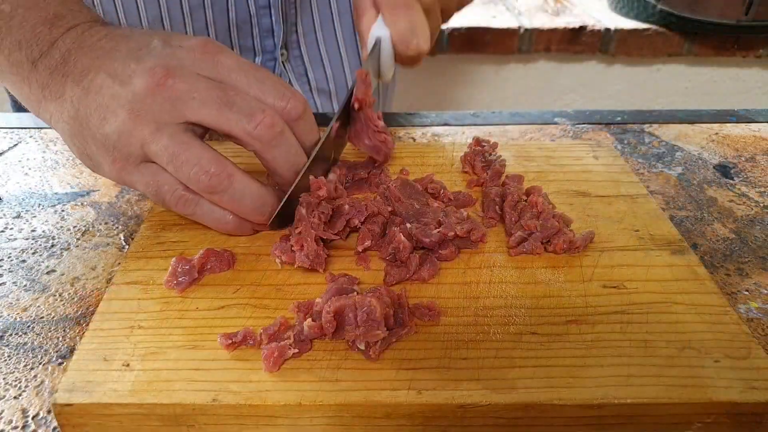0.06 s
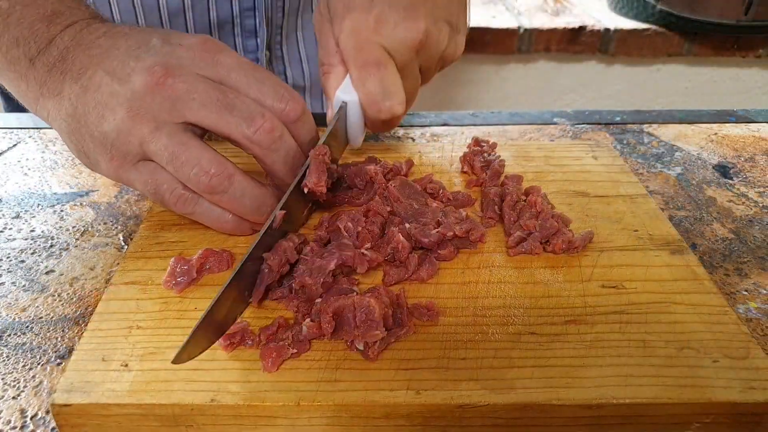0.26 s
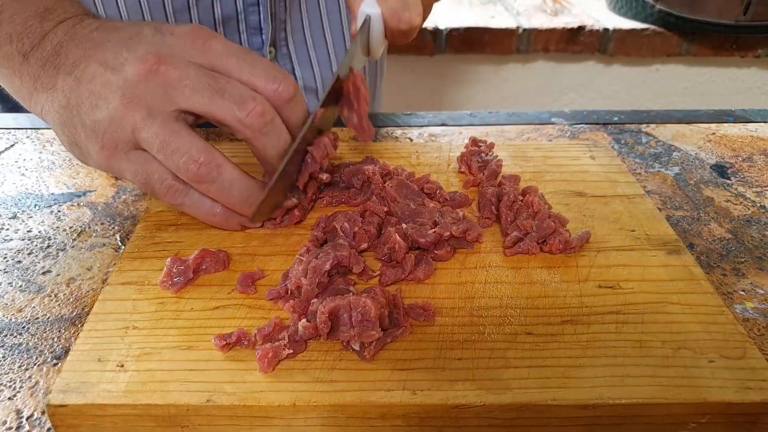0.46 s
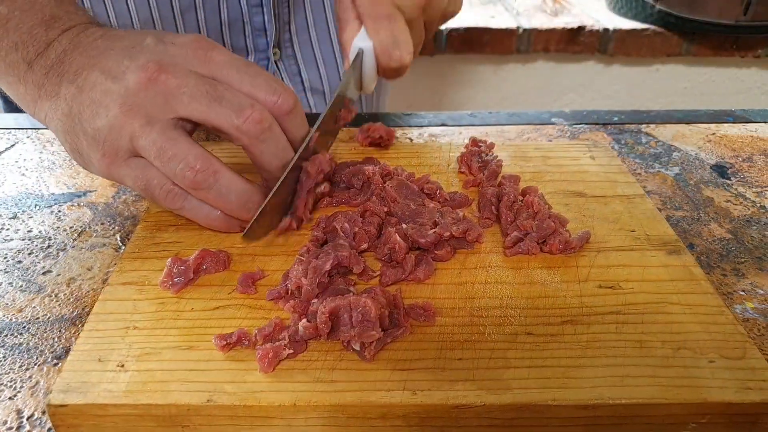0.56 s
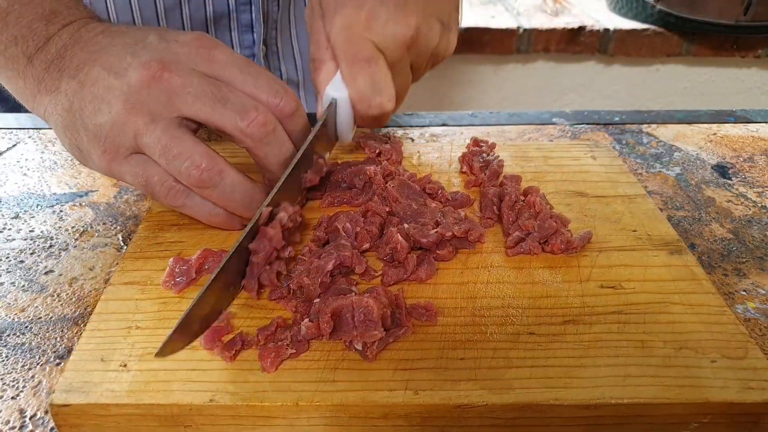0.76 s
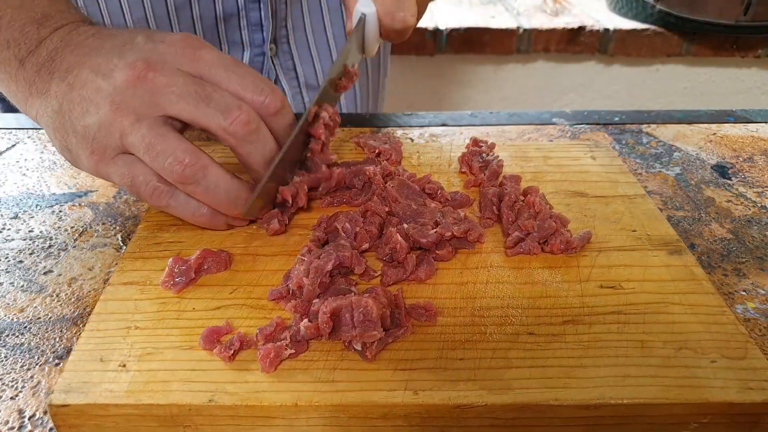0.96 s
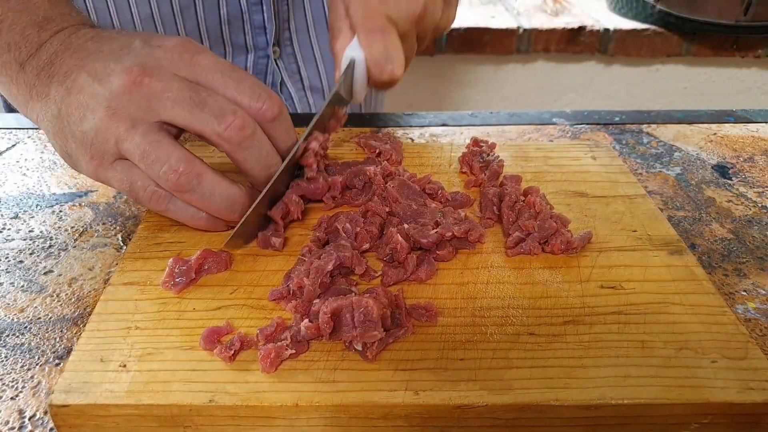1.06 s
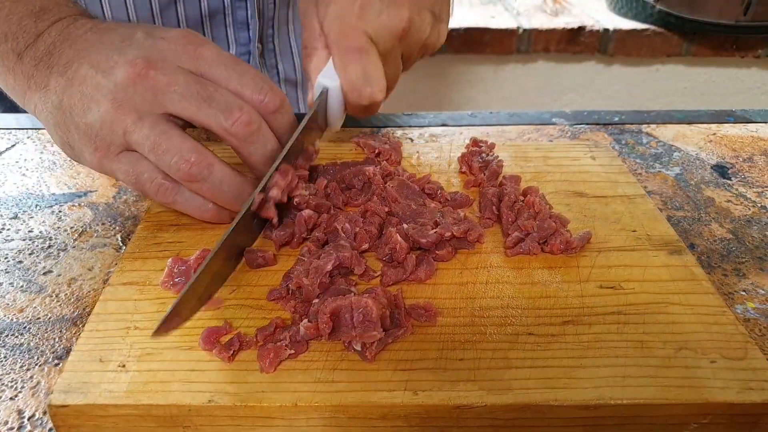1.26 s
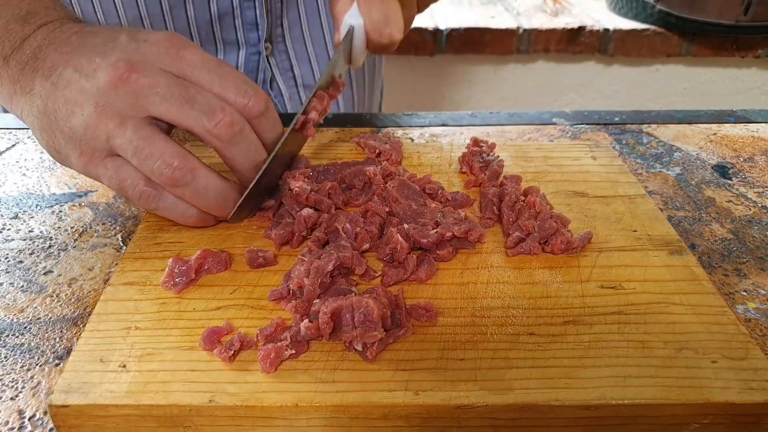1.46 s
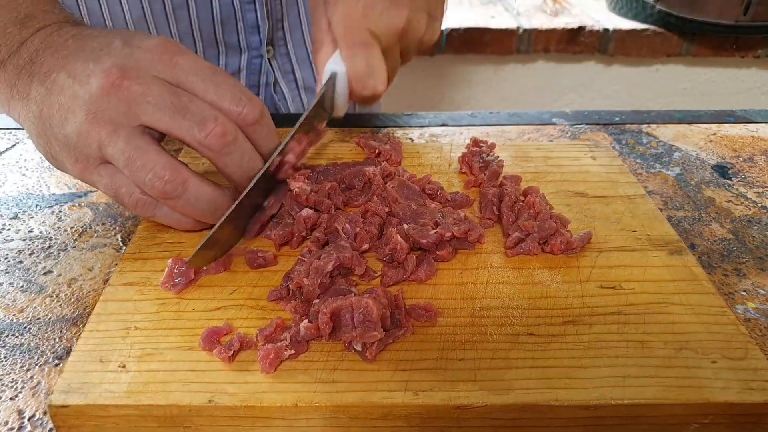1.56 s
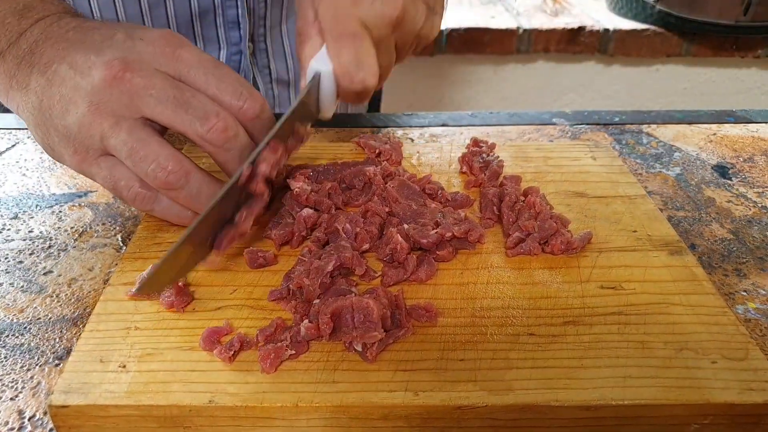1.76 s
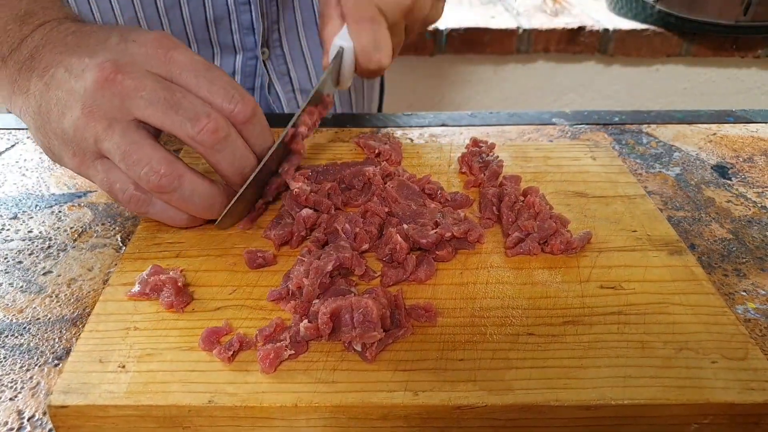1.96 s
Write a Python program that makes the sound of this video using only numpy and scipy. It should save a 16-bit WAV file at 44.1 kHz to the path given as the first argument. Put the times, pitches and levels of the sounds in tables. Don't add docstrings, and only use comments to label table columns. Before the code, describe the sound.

Knife blade knocking a wooden cutting board about twice a second, rubbing through wet raw meat

```python
import sys
import numpy as np
from scipy import signal
from scipy.fft import rfft, irfft, next_fast_len
from scipy.io import wavfile
from scipy.ndimage import uniform_filter1d, map_coordinates

SR = 44100
rng = np.random.default_rng(int(sys.argv[2]) if len(sys.argv) > 2 else 0)


def output_pcm(signal):
    pcm = np.clip(np.atleast_2d(signal).T, -1, 1) * 32767
    wavfile.write(sys.argv[1], SR, np.round(pcm).astype(np.int16))


def ratio(d):
    e = np.asarray(d, float) / 20
    return 10 ** e


N = 88200
T = np.arange(N) / SR


def unit(x):
    return x / np.sqrt(np.mean(x ** 2) + 1e-20)


def along(points, hz):
    f, v = np.transpose(points)
    return np.interp(np.log(hz + 1), np.log(f + 1), v)


def wobble(rate):
    knots = rng.standard_normal(int(N * rate / SR) + 4)
    return map_coordinates(knots, [T * rate])


def filtered(x, response):
    m = next_fast_len(N + SR // 2)
    return irfft(rfft(x, m) * response(np.fft.rfftfreq(m, 1 / SR)), m)[..., :N]


def spread(pair, gain, alike):
    turn = lambda hz: np.arccos(np.clip(along(alike, hz), -1, 1)) / 2
    mid, side = filtered(pair, lambda hz: gain(hz) * [np.cos(turn(hz)), np.sin(turn(hz))])
    return unit(np.array([mid + side, mid - side]))


def add(track, s, sound):
    part = track[..., max(round(s * SR), 0):][..., :sound.shape[-1]]
    part += sound[..., :part.shape[-1]]


def grains(per_s, spread_db):
    clicks = (rng.random((2, N)) < per_s / SR) * rng.standard_normal((2, N))
    return clicks * ratio(spread_db * rng.exponential(size=(2, N)))


def peak_one(x):
    return x / np.abs(x).max()


def ring(db, hz, t60):
    contact_s, quick_hz = .002, 900
    t = T[:SR // 8]
    onset = 1 - np.exp(-t * max(hz / quick_hz, 1) ** 2 / contact_s)
    return -ratio(db - 60 * t / t60) * np.sin(2 * np.pi * hz * t) * onset


# frequency in Hz, level in dB,
# t60 in seconds, side of the node line # struck (+1 or -1).
BOARD_MODES = [(180, -12, .017, 1), (243, -3, .004, -1), (342, -27, .1, 1), (444, -22, .05, -1),
               (666, 0, .017, 1), (749, -5.5, .015, 1), (904, -24, .036, -1), (990, -12.5, .018, 1),
               (1275, -21.5, .023, -1),
               (1520, -27, .017, 1), (1780, -29, .014, -1), (2140, -21, .014, 1), (2590, -23, .016, -1),
               (3130, -26, .017, 1), (3650, -26, .015, -1)]


def board(tilt_db):
    total = 0
    for hz, db, t60, side in BOARD_MODES:
        scatter_db = .8 * rng.normal()
        brightness_db = tilt_db * max(np.log2(hz / 800), 0)
        total = total + side * ring(db + scatter_db + brightness_db, hz, t60)
    return total


# start in seconds, peak level in dB,
# brightness in dB per octave above the body.
BLOWS = [
    (.21025, -15.8, 4),
    (.7055, -18, -4.5),
    (1.177, -22, -3),
    (1.6533, -21.3, -5),
]


def blows():
    thump_hz, thump_db, thump_t60_s = 170, -25, .07
    crack_hz, crack_db, crack_t60_s = 5500, -19, .014
    wood, t = np.zeros(N), T[:SR // 8]
    lowpass = signal.butter(2, crack_hz, fs=SR)
    for s, db, tilt_db in BLOWS:
        noise = signal.lfilter(*lowpass, rng.standard_normal(len(t)))
        crack = ratio(crack_db + tilt_db - 60 * t / crack_t60_s) * noise
        thump = ring(thump_db, thump_hz, thump_t60_s)
        add(wood, s, ratio(db) * (peak_one(board(tilt_db)) + thump + crack))
    return wood


# start in seconds, peak level in dB, frequency in Hz.
TOUCHES = [(.166, -59, 507), (.177, -47.5, 720), (.229, -38.5, 680), (.676, -49, 660), (.692, -35.5, 695),
           (.726, -40.5, 720), (.740, -42.5, 790), (1.151, -48.5, 680), (1.163, -42, 684),
           (1.168, -40, 680), (1.194, -46, 680), (1.213, -60, 720), (1.241, -53, 850), (1.266, -50, 880),
           (1.279, -45.5, 906), (1.633, -48, 666), (1.640, -41.5, 650), (1.646, -41.5, 640),
           (1.679, -39.5, 766), (1.686, -45, 826), (1.735, -39, 775), (1.771, -46.5, 870)]
# start in seconds, level in dB, frequency in Hz.
RATTLE = [(0.00079, -28.5, 1246), (0.016, -42, 1385), (0.0054, -42.5, 3300), (0.00193, -45, 3300),
          (0.002, -45, 2600), (.023, -39.5, 1540), (0.01, -46, 1300)]


def touches():
    judder_s, judder_db = .004, 0
    touch_t60_s, second_mode_ratio, rattle_t60_s = .022, 1.088, .009
    slips = lambda: rng.standard_normal(round(judder_s * SR)) / np.sqrt(judder_s * SR)
    wood = np.zeros(N)
    for s, db, hz in TOUCHES:
        pair = ring(0, hz, touch_t60_s) + ring(-9.5, second_mode_ratio * hz, touch_t60_s)
        add(wood, s, ratio(db + judder_db) * peak_one(signal.fftconvolve(pair, slips())))
    for s, db, hz in RATTLE:
        add(wood, s, signal.fftconvolve(ring(db, hz, rattle_t60_s), slips()))
    return wood


# landing in seconds, cut length in seconds, slide length in seconds,
# slide level in dB.
STROKES = [
    (0.203, 0.045, 0.13, -42),
    (0.703, 0.044, 0.11, -42.5),
    (1.177, 0.032, 0.12, -43),
    (1.651, 0.03, 0.12, -43.5),
]


def pressure():
    cut_start_db, cut_rise_db, cut_end_db = -19.5, 22, -8
    bite_db, sag_db, lift_db = 1.5, -5.5, -22
    release_s, lift_fade_db_per_s = .035, 136
    levels = [cut_start_db - cut_rise_db, cut_start_db, cut_end_db, bite_db, -.6, sag_db, lift_db]
    gain = ratio(-63 - 480 * np.clip(T - .015, 0, None))
    for s, cut, slide, db in STROKES:
        end = s + slide + release_s
        times = [s - cut - .015, s - cut, s - .001, s, s + 0.23 * slide, s + slide, end]
        shape = np.interp(T, times, levels, left=-90)
        gain = gain + ratio(db + shape - lift_fade_db_per_s * np.clip(T - end, 0, None))
    return gain


# frequency in Hz, level in dB.
SLIDE = [(150, -46), (250, -12.5), (759, -9), (1130, -11.5), (1320, -2), (1940, -14.5), (3740, -10.5),
         (7490, -13), (15800, -17)]
# frequency in Hz, coherence.
SLIDE_ALIKE = [(300, .85), (1000, .7), (3500, .5), (8000, .4), (15000, .35)]
# frequency in Hz, width in Hz, level in dB.
BLADE = [(720, 240, 6), (1420, 160, -4.5), (2210, 143, 7), (2866, 375, 6.5), (3216, 94, 5.5),
         (3660, 360, 8.5), (4220, 48, 8), (5130, 84, -1), (7420, 1130, -6)]
# frequency in Hz, width in Hz, level in dB.
HEEL = [(680, 120, 4), (3738, 115, 5), (3240, 280, -2.5)]
# frequency in Hz, width in Hz, level in dB.
TIP = [(880, 72, 3.5), (3830, 170, -4.5), (3220, 250, 3.5), (5120, 650, 4.5)]


def scrape():
    chatter_db, rasp_db, swell_db, streak_db = 1.4, 1.5, .7, 2.5
    z = signal.stft(grains(16000, 2.2), nperseg=512)[2]
    streaks = uniform_filter1d(rng.standard_normal(z.shape[1:]), size=2, axis=0)
    streaks = uniform_filter1d(streaks, size=7, axis=1)
    rubbed = signal.istft(z * ratio(streak_db * unit(streaks)), nperseg=512)[1][:, :N]

    def at(part):
        peaks = lambda hz: sum(db * np.exp(-((hz - c) / w) ** 2) for c, w, db in BLADE + part)
        return spread(rubbed, lambda hz: ratio(along([(80, -31)] + SLIDE, hz) + peaks(hz)), SLIDE_ALIKE)

    tip, cutting = np.zeros(N), np.zeros(N)
    for s, cut, slide, db in STROKES:
        tip += np.interp(T, [s + .4 * slide, s + .8 * slide, s + .3, s + .31], [0, 1, 1, 0])
        tip += .6 * ((T > s - .1) & (T < s))
        cutting += (T > s - cut - .015) & (T < s)
    uneven_db = (chatter_db + rasp_db * cutting) * wobble(90) + swell_db * wobble(22.6)
    return ((1 - tip) * at(HEEL) + tip * at(TIP)) * pressure() * ratio(uneven_db)


# start in seconds, length in seconds, level in dB.
PEELS = [
    (0.333, 0.099, -69.5),
    (0.837, 0.033, -80),
    (1.333, 0.098, -67),
    (1.802, 0.03, -61),
    (1.55, 0.13, -71.5),
    (1.968, 0.028, -85),
]
# frequency in Hz, level in dB.
PEEL = [(1500, 11), (3500, -0.5), (6500, -14), (10000, -11), (13000, -12), (14600, -4), (16000, -31)]


def peeling():
    gain = 0
    for s, length, db in PEELS:
        gain = gain + ratio(db) * np.clip(np.minimum(T - s, s + length - T) / 0.0082, 0, 1)
    crackle = spread(grains(6000, 3.4), lambda hz: ratio(along(PEEL, hz)), [(1000, 0.5)])
    return crackle * gain * ratio(3.1 * wobble(58.7))


# start in seconds, peak level in dB, left-right difference in dB,
# dull part in dB.
TICKS = [(.132, -55, 0, -4), (0.1504, -54, -5, -12), (.158, -43.5, 7, -19), (.167, -51, -8, 2),
         (0.179, -47.5, -3, 7), (0.3442, -37.5, -7, -3), (.440, -66, -2, -5), (.553, -68, 0, -10),
         (0.5616, -56, .6, -15), (.587, -56, 0, -15), (.5895, -49.5, 2.5, -1), (0.6205, -44, -5, -23),
         (0.6568, -42.5, -2, -7), (.6764, -57, 0, -5), (0.693, -45, -10, 8), (.857, -61, -4, -3),
         (1.0789, -63.5, 1, -10), (1.1488, -67, -3.5, -8), (1.353, -59.5, -5, 8), (1.5574, -64, -2.5, 1),
         (1.5988, -52, -2.5, -17)]
# frequency in Hz, level in dB.
TICK_BRIGHT = [(3000, -48), (5500, -9), (7000, -16.5), (9000, 2.5), (11500, -2), (14000, -8), (16000, -14)]
# frequency in Hz, level in dB.
TICK_DULL = [(800, -37), (2000, -15), (3600, 4.5), (5500, -13), (9000, -43)]


def fibres():
    tick_t60_s, tick_db = .006, 5
    bright, dull, t = np.zeros((2, N)), np.zeros((2, N)), T[:SR // 30]
    for s, db, pan, dull_db in TICKS:
        burst = rng.standard_normal(len(t)) * ratio(-60 * t / tick_t60_s) * (1 - np.exp(-t / 0.00032))
        burst = ratio(db + tick_db + np.array([[pan / 2], [-pan / 2]])) * burst
        add(bright, s, burst)
        add(dull, s, ratio(dull_db + 6.5) * burst)
    bright = filtered(bright, lambda hz: ratio(along(TICK_BRIGHT, hz)))
    return bright + filtered(dull, lambda hz: ratio(along(TICK_DULL, hz)))


# frequency in Hz, t60 in seconds.
KITCHEN = [(200, .12), (2000, .12), (10000, .08)]


def kitchen(x):
    hz, t, z = signal.stft(rng.standard_normal((2, SR // 3)), SR, nperseg=256)
    decay = ratio(-60 * t / along(KITCHEN, hz)[:, None])
    tail = signal.istft(z * decay, SR, nperseg=256)[1]
    late = np.pad(x, (200, 0))[None]
    return signal.fftconvolve(late, tail / np.linalg.norm(tail[0]), axes=1)[:, :N]


# time in seconds, level in dB.
SIZZLE = [(0, -75), (.3, -73), (.6, -68), (.85, -93), (1.3, -75.5), (2, -90)]


def sizzle():
    shape = lambda hz: np.exp(-((hz - 3370) / 250) ** 2)
    band = spread(rng.standard_normal((2, N)), shape, [(1000, -.2)])
    return band * ratio(np.interp(T, *np.transpose(SIZZLE)))


# frequency in Hz, coherence.
ROOM_ALIKE = [(60, 1), (180, 0.77), (550, 0.56), (1650, -0.17), (4970, 0.27), (15000, -0.73)]


def room_noise(points):
    return spread(rng.standard_normal((2, N)), lambda hz: ratio(along(points, hz)), ROOM_ALIKE)


# time in seconds, level in dB.
SURGE = [(0.0, -57), (0.1, -50), (0.15, -58.5), (0.19, -48.5), (0.28, -53.5), (0.39, -48.5), (0.45, -60.5),
         (0.73, -47), (0.76, -56), (0.89, -57), (1.04, -61), (1.1, -50), (1.33, -57.5), (1.49, -57),
         (1.63, -60), (1.65, -51), (1.82, -53), (2.0, -55.5)]
# frequency in Hz, level in dB.
DEEP = [(15, -60), (40, -24), (60, 2.5), (85, -3.5), (115, -7.5), (145, -12.5), (250, -50)]
# frequency in Hz, level in dB.
RUMBLE = [(80, -61), (170, 0.5), (210, 0), (280, -7), (340, -6.5), (530, -6.5), (900, -23.5), (1200, -22)]
# frequency in Hz, level in dB.
TRAFFIC = [(12, -30), (25, -3), (40, 7), (60, -35.5)]
# frequency in Hz, level in dB.
HISS = [(410, -75), (700, -5), (1090, -13), (1330, -3.5), (1610, -8), (2510, -10), (3350, -10), (3910, -17),
        (15800, -61)]


def background():
    surges = room_noise(DEEP) * ratio(np.interp(T, *np.transpose(SURGE)))
    murmur = room_noise(RUMBLE + [(1800, -68.5)]) * ratio(-60 + 1.2 * wobble(7.6))
    traffic = ratio(-74.5) * room_noise(TRAFFIC)
    hiss = ratio(-71 + 0.81 * wobble(5.65)) * room_noise([(300, -60)] + HISS)
    return (surges + murmur + traffic) * ratio([[-.6], [.6]]) + hiss


# frequency in Hz, left-right difference in dB.
LEAN = [(100, -3.5), (600, -0.5), (1400, 2), (3000, -7), (5500, -2.5), (8500, 6), (11000, -2),
        (14000, -7.5)]
# frequency in Hz, lead of the left in seconds.
LEFT_LEADS = [(800, .00005), (2000, .000136)]


def scene():
    near = blows() + touches() + scrape() + fibres() + peeling()
    side = np.array([[.5], [-.5]])

    def ports(hz):
        lead = np.exp(2j * np.pi * hz * side * along(LEFT_LEADS, hz))
        return ratio(side * along(LEAN, hz)) * lead

    return filtered(near, ports) + ratio(-24) * kitchen(near[0]) + background() + sizzle()


def band_limit(x):
    return signal.sosfilt(signal.butter(12, 15950, fs=SR, output="sos"), x)


def record(dry):
    mix = filtered(dry, lambda hz: hz < 15900)
    return band_limit(mix)


dry = scene()
out = record(dry)
output_pcm(out)
```